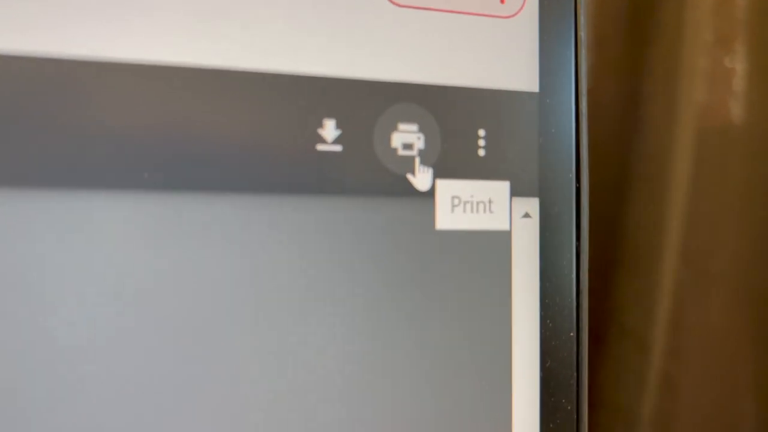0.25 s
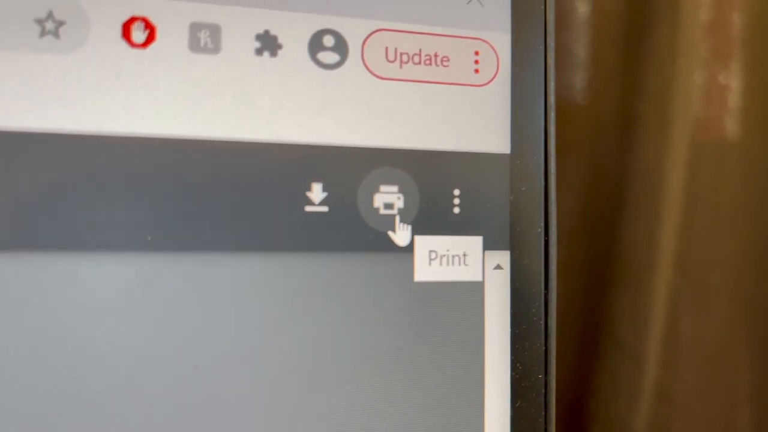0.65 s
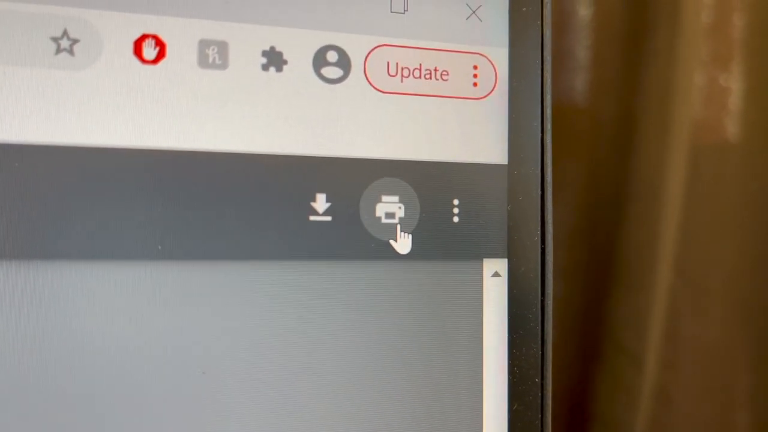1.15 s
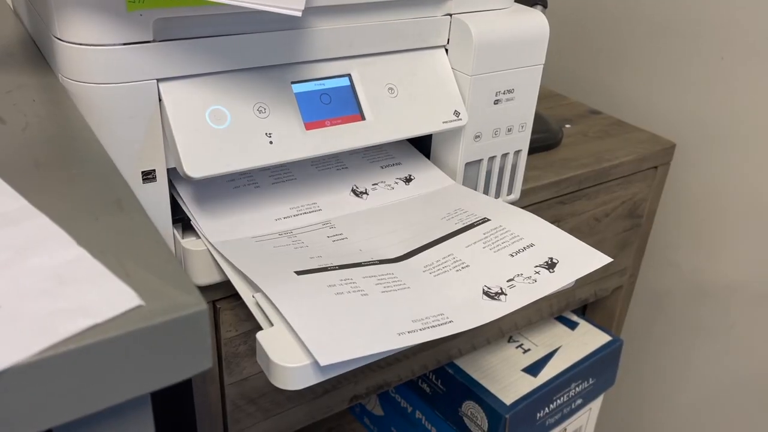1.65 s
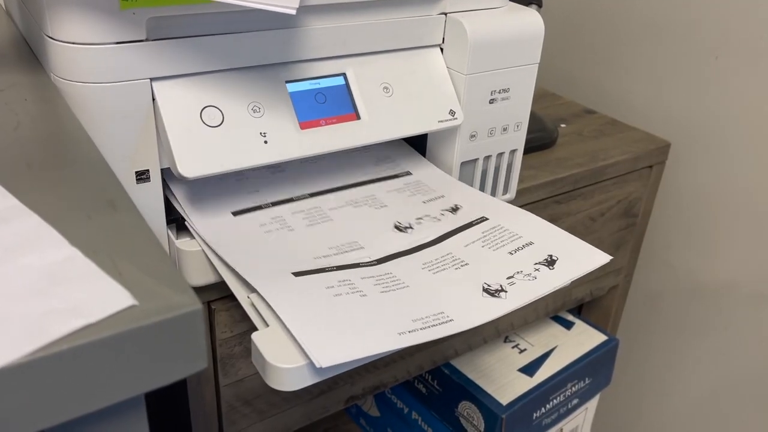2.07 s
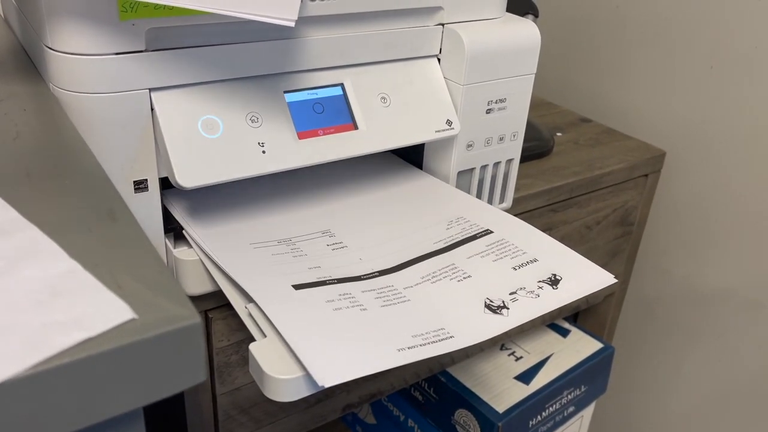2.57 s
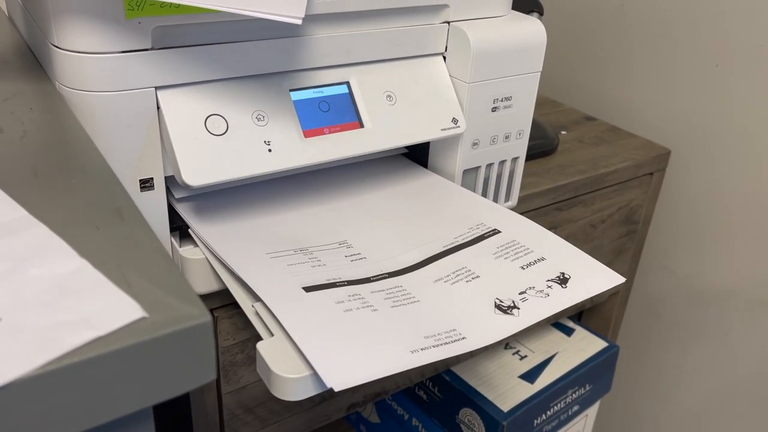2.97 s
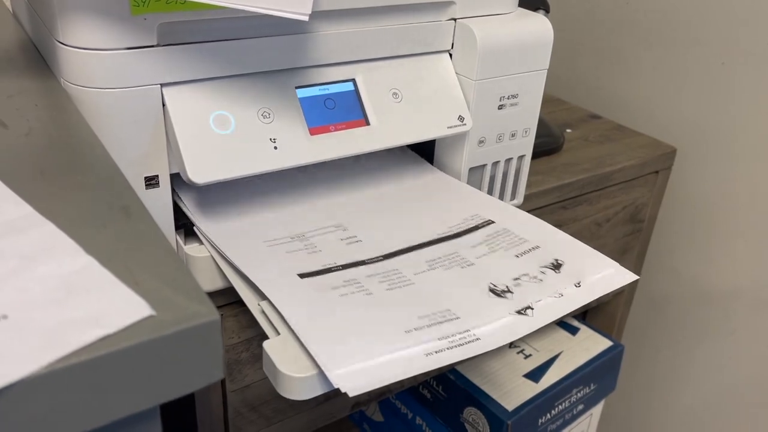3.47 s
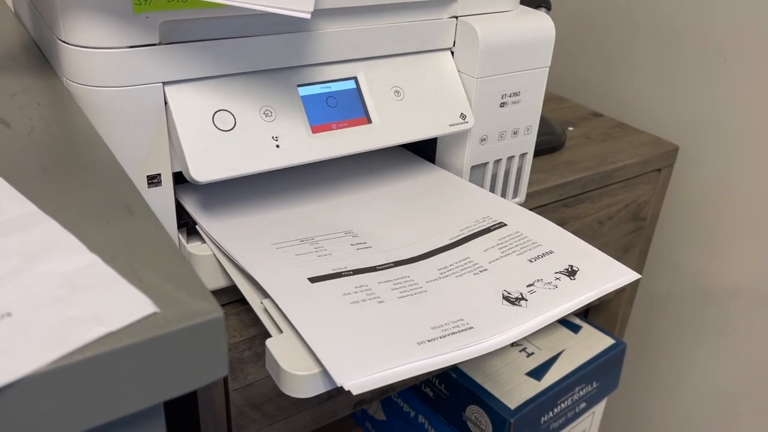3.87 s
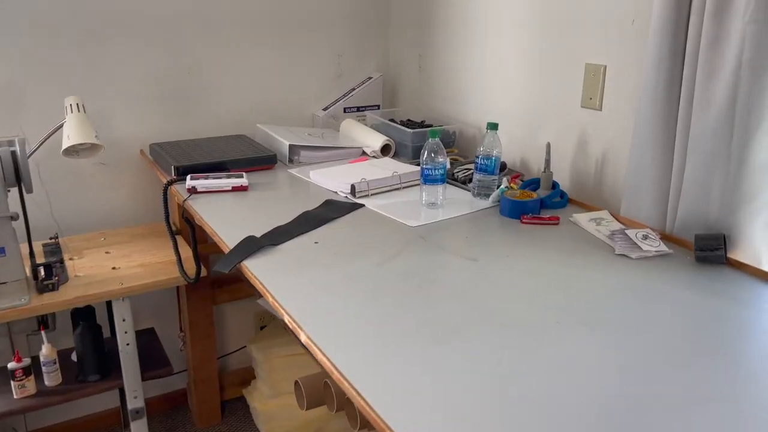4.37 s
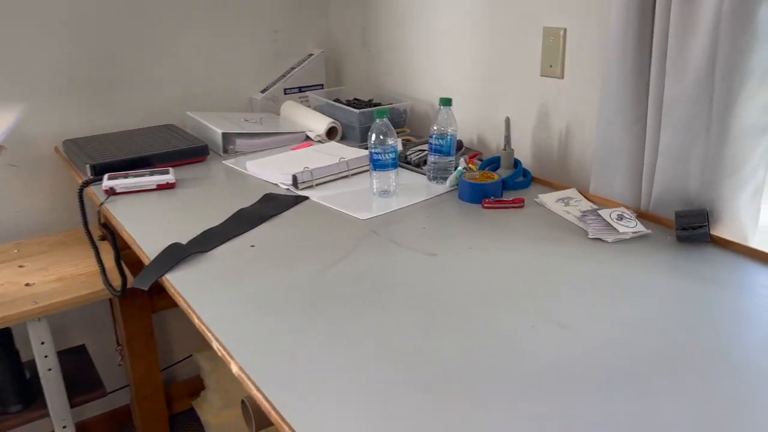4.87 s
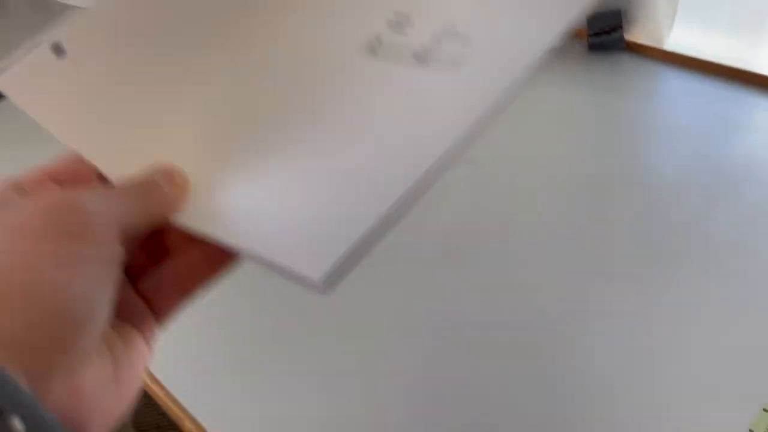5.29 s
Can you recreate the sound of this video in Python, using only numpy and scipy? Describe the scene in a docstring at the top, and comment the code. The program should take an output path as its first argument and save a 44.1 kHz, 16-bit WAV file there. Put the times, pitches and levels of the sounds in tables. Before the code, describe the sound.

For the first 1.3 seconds there is only faint, low office air, with a mouse click at about 0.8 s: a light press, then a brighter release just before 0.9 s. At 1.3 s an inkjet printer cuts in, close and slightly left. Paper rollers rattle and hiss in near-continuous short bursts until 2.0 s; then the carriage shuttles with a wavering motor whine, mixed with feed bursts. Plastic latches tick and knock throughout, the sharpest at 2.83 s. Activity dips around 2.9-3.1 s, then busy whirring resumes until an abrupt stop at 4.2 s. A low, boomy workroom rumble replaces it. A carried sheet swishes faintly, with soft bumps near 4.8, 5.0 and 5.2 s and a crackle around 5.35-5.4 s. At 5.47 s paper and hand slap the table: a very loud, clipped crack with a thumping, briefly ringing tabletop, decaying into rumble.

```python
"""Mouse click, inkjet printer and paper slap

A mouse button clicks in a quiet office, then an inkjet printer is heard in short, abrupt bursts.
Noise shaped by resonances makes its rattle and paper hiss, wavering sine tones its motor whine,
and short fading noise its latches. In a rumbling workroom the printed sheet then rustles as swells
of noise and is slapped on a table, whose ringing tones and crack overload the microphones."""
import sys
import numpy as np
from scipy import signal
from scipy.fft import rfft, irfft
from scipy.io import wavfile
from scipy.ndimage import map_coordinates

SR = 44100
rng = np.random.default_rng(int(sys.argv[2]) if len(sys.argv) > 2 else 0)


def digitize_waveform(pressure):
    """Quantize a signal to 16-bit integers and store it at the path in sys.argv[1].

    Rows of a 2-D input are taken as channels; values are limited to [-1, 1].
    """
    field = np.atleast_2d(pressure).T
    bounded = np.clip(field, -1, 1)
    quanta = np.round(bounded * 32767).astype(np.int16)
    wavfile.write(sys.argv[1], SR, quanta)


N = 243873
T = np.arange(N) / SR  # time of each sample in seconds
HZ = np.maximum(np.arange(N // 2 + 1) * SR / N, 1)  # frequency of each spectrum point
PRINTER_ON_S, PRINTER_OFF_S = 1.32, 4.19


def undb(db):
    """Turn decibels into gain."""
    return 10 ** (np.asarray(db) / 20)


def unit(x):
    """Scale a sound to rms 1."""
    return x / np.sqrt(np.mean(x ** 2))


def colour(points):
    """Gain at every frequency, joined through (Hz, dB) points on a logarithmic pitch scale."""
    hz, db = np.transpose(points)
    return undb(np.interp(np.log(HZ), np.log(hz), db))


def resonance(hz, width_hz):
    """Complex response of one resonance, gain 1 at its centre."""
    return 1 / (1 + 1j * (HZ / hz - hz / HZ) * hz / width_hz)


def shape(x, response):
    """Filter a sound by a frequency response."""
    return irfft(rfft(x) * response, N)


def wander(count, size):
    """Smooth random values with about count turns over size points, spread near 1."""
    knots = rng.standard_normal(count + 4)
    return map_coordinates(knots, [np.linspace(1, count + 1, size)], order=2)


def walk(rate):
    """Smooth chance through time, with about 2 * rate turns a second."""
    return wander(int(2 * rate * T[-1]), N)


def gate(start, end, edge=.0015):
    """1 between two times, with short ramps of edge seconds."""
    opening = np.clip((T - start) / edge + .5, 0, 1)
    closing = np.clip((end - T) / edge + .5, 0, 1)
    return opening * closing


def curve(rows):
    """Join (seconds, value) points through time."""
    return np.interp(T, *np.transpose(rows))


def fade(start, t60, rise=0.00058):
    """Envelope of a blow: quick rise, then an exponential fall of 60 dB in t60 seconds."""
    age = np.maximum(T - start, 0)
    return (1 - np.exp(-age / rise)) * np.exp(-np.log(1000) * age / t60)


# How wide the noise is between left and right.
# Each row: frequency in Hz, level of the side signal relative to the middle in dB.
STEREO_WIDTH = [(60, -19.5), (200, -15.5), (400, -6.5), (700, -11), (1200, -4), (2200, -1.5), (4000, -3.5),
                (7000, -5), (9000, -22.5), (10200, -34), (12000, -22)]


def texture(response, grain_db=0):
    """Stereo noise of tiny impacts through a response, middle at rms 1; grain spreads their sizes."""
    # each size holds for 16 samples
    sizes = np.repeat(undb(grain_db * rng.exponential(size=N // 16 + 1)), 16)[:N]
    impacts = rng.standard_normal((2, N)) * sizes
    mid, side = shape(impacts, response)
    side = shape(side, colour(STEREO_WIDTH))
    return np.array([mid + side, mid - side]) / np.std(mid)


# Bursts of the rollers that advance the paper.
# Each row: start in seconds, end in seconds, swell in seconds, fall in seconds, rattle in dB,
# then hiss and gear whine relative to that rattle in dB (printer() trims rattle and hiss further).
PAPER_BURSTS = [ (1.32, 1.471, .07, 0.031, -32.5, -3.5, -16), (1.466, 1.583, 0.031, 0.027, -35.5, -4, -0.5),
                (1.579, 1.687, 0.014, 0.067, -34, -4, -5), (1.697, 1.901, 0.034, 0.0069, -32.5, -5, 0.5),
                (1.895, 2.007, 0.016, 0.032, -35.5, -3, 1.5), (2.304, 2.356, 0.049, 0.0026, -32, -4.5, -7),
                (2.809, 2.91, 0.0021, 0.018, -32, -6, -9), (3.359, 3.431, 0.038, 0.015, -33.5, -2, -3.5)]
# Bursts of the carriage on its rail. Each row: the same columns, with the whine of its motor.
CARRIAGE_BURSTS = [ (2.031, 2.053, 0.017, 0.0033, -37, -4, -9), (2.087, 2.305, 0.03, 0.051, -32.5, -4, 1),
                   (2.402, 2.475, 0.044, 0.034, -35, -1, -10),
                   (2.498, 2.608, 0.0033, 0.065, -31.5, -3, 0.5),
                   (2.589, 2.661, 0.026, .014, -32, -3, -0.5), (2.664, 2.787, .008, 0.052, -32.5, -3, -3.5),
                   (3.003, 3.072, 0.0023, 0.063, -51, -2.5, -17), (3.073, 3.1, .002, 0.034, -43, -10, -8),
                   (3.111, 3.346, 0.0023, 0.059, -32, -4, 2.5), (3.448, 3.64, 0.034, .052, -32, -3.8, 3),
                   (3.643, 3.732, 0.047, 0.0078, -31.5, -5.5, -8), (3.736, 3.851, 0.015, 0.043, -34, -2, 2),
                   (3.866, 3.963, 0.021, 0.041, -32, -4.5, 4), (3.953, 4.032, 0.024, .009, -32.3, -3.5, 6),
                   (4.036, 4.145, .011, 0.059, -32.5, -4.5, -2.5),
                   (4.161, 4.191, 0.019, 0.01, -40, -3.5, -10.5)]
# Tone colour of the paper feed, of the carriage and of the hiss.
# Each row: frequency in Hz, level in dB per Hz.
FEED_COLOUR = [(110, -32), (180, -5), (398, -8), (696, 1), (851, -4), (930, -1.5), (1160, -5.5), (1610, -8),
               (1800, -11), (2380, -18), (2600, -13.5), (3380, -54), (5720, -120)]
CARRIAGE_COLOUR = [(110, -18), (180, -19), (199, -5), (416, -9), (481, -0.5), (795, -1), (860, -2.5),
                   (1090, -0.5), (1180, 0), (1270, -4), (1470, -6), (1590, 0), (1780, -9), (2250, -13),
                   (2600, -12), (3380, -67), (5720, -120)]
HISS_COLOUR = [(1500, -15.5), (2200, -6.5), (2700, -2.5), (3250, 1), (4000, -3), (5000, -6), (6500, -7),
               (7600, -7.5), (8800, -3.5), (10000, -7), (11200, -8.5), (12200, -15), (12800, -27),
               (13600, -52)]
# Resonances of the plastic housing, which printer() lifts by ring_db.
# Each row: centre in Hz, width in Hz, level in dB.
HOUSING_RESONANCES = [(362, 110, -4.5), (592, 32, -16), (631, 9.9, 3), (700, 29, -1), (814, 30, -1),
                      (924, 57, 1), (1090, 31, -3), (1360, 120, 2.5), (1730, 37, -14), (1840, 66, 0)]
# Gear tones of the paper feed. Each row: frequency in Hz, level relative to the feed whine in dB.
FEED_TONES = [(646, -13), (942, -6), (1287, -19), (1464, -14), (2019, -22), (2912, -31), (3542, -34.5)]
# Tones of the carriage motor.
# Each row: multiple of the cogging rate, level relative to the motor whine in dB.
COG_ORDERS = [(5, -16.5), (7, -13.5), (8, -14), (10, -10), (12, -31), (20, -21), (25, -24)]
COG_HZ = 158


def printer(rattle_db=-0.27, hiss_db=-1.5, ring_db=1, tooth_depth=0.045, judder_db=1.0):
    """Gear teeth rattle the housing, paper and rail hiss, motors whine; all are heard in bursts."""
    feed, paper_slide, rolling = burst_levels(PAPER_BURSTS)
    carriage, rail_slide, cruise = burst_levels(CARRIAGE_BURSTS)
    ring_powers = [abs(undb(db + ring_db) * resonance(hz, width_hz)) ** 2
                   for hz, width_hz, db in HOUSING_RESONANCES]
    housing = np.sqrt(1 + sum(ring_powers))

    # each cog of the motor presses the teeth together once
    cog_phase = 2 * np.pi * np.cumsum(COG_HZ * (1 + 0.027 * walk(12))) / SR
    cogs = unit(1 + tooth_depth * np.cos(cog_phase))
    teeth = travelling(housing, grain_db=2.0, ripple_db=3.0) * undb(judder_db * walk(30))
    feed_rattle = feed * unit(shape(teeth, colour(FEED_COLOUR)))
    carriage_rattle = carriage * unit(shape(teeth, colour(CARRIAGE_COLOUR)))
    rattle = undb(rattle_db) * (feed_rattle + carriage_rattle)

    hiss_noise = travelling(colour(HISS_COLOUR), grain_db=1.8, ripple_db=3.0)
    hiss_noise = hiss_noise * undb(1.3 * walk(69.4))  # the hiss flickers quickly
    hiss = undb(hiss_db) * (paper_slide + rail_slide) * hiss_noise

    feed_whine = rolling * sum(undb(db) * tone(hz, drift=0.0085) for hz, db in FEED_TONES)
    motor_tones = sum(undb(db) * tone(order * COG_HZ, drift=0.00581) for order, db in COG_ORDERS)
    return cogs * (rattle + hiss) + feed_whine + cruise * motor_tones


def burst_levels(bursts, tail_db=-17, tail_t60=0.044, hiss_power=1.295, whine_power=1.9):
    """Rattle follows each burst and leaves a faint tail; hiss and whine follow powers of its level."""
    rattle = hiss = whine = 0
    for start, end, swell_s, fall_s, db, rel_hiss_db, rel_whine_db in bursts:
        level = burst(start, end, swell_s, fall_s)
        rattle = rattle + undb(db) * (level + undb(tail_db) * fade(end, tail_t60))
        hiss = hiss + undb(db + rel_hiss_db) * level ** hiss_power
        whine = whine + undb(db + rel_whine_db) * level ** whine_power
    return rattle, hiss, whine


def burst(start, end, swell_s, fall_s, start_level=.25, end_level=0.1):
    """Level of one burst: abrupt start, swell towards full level (1), fall, abrupt end."""
    rising = start_level + (1 - start_level) * (T - start) / swell_s
    falling = end_level + (1 - end_level) * (end - T) / fall_s
    return gate(start, end) * np.clip(np.minimum(rising, falling), 0, 1)


def travelling(response, grain_db, ripple_db, count=3):
    """Impacts from a moving part: each place on its way rings the casing with its own fine peaks."""
    places = []
    for _ in range(count):
        fine_peaks = undb(ripple_db * wander(len(HZ) // 400, len(HZ)))
        places.append(texture(response * fine_peaks, grain_db))
    nearness = np.exp(1.5 * np.array([walk(4) for _ in range(count)]))
    nearness = nearness / np.linalg.norm(nearness, axis=0)  # steady total power
    return sum(near * place for near, place in zip(nearness, places))


def tone(hz, drift):
    """A sine of rms 1 whose pitch wavers; reflections shift its phase between the ears."""
    phase = 2 * np.pi * np.cumsum(hz * (1 + drift * walk(24.96))) / SR
    spread = 0.56 * walk(4)
    return np.sqrt(2) * np.sin([phase + spread, phase - spread])


# Latches that snap. Each row: start in seconds, tick in dB, knock relative to the tick in dB.
LATCH_SNAPS = [(1.383, -34.5, 8), (1.717, -24.5, -1.5), (1.923, -22.5, -4.5), (2.087, -35, 0),
               (2.421, -26.5, -4), (2.497, -32, 2), (2.676, -24.5, -3), (2.809, -39, 6), (2.834, -14, -9),
               (2.841, -39, 14), (2.868, -23.5, -3), (2.914, -23, -11), (3.075, -38.5, -12),
               (3.111, -45, -11), (3.235, -21.5, -15), (3.401, -33, 10), (3.668, -25.5, -3)]
# Tone colour of the tick. Each row: frequency in Hz, level in dB per Hz.
TICK_COLOUR = [(1200, -15.5), (2400, -8.5), (3600, 7.5), (6000, -4.5), (9000, 7.5), (11500, -1),
               (13500, -44)]


def latches(tick_t60=0.019, knock_t60=0.039, soft_s=0.001):
    """Plastic parts snap into place: a bright tick and a duller knock of the housing."""
    tick = knock = 0
    for s, db, knock_db in LATCH_SNAPS:
        tick = tick + undb(db) * fade(s, tick_t60, rise=soft_s)
        knock = knock + undb(db + knock_db) * fade(s, knock_t60, rise=soft_s)
    return tick * texture(colour(TICK_COLOUR)) + knock * texture(colour(FEED_COLOUR))


# The paper catching on its guides. Each row: peak in seconds, half-width in seconds
# (where the swell is down to 37 %), hiss in dB, housing sound relative to the hiss in dB.
GUIDE_SCRAPES = [(1.497, .008, -34, -6), (2.166, .012, -33, -1), (2.231, .017, -32.5, 2.5),
                 (2.63, .016, -34, 1), (3.991, .013, -33, -3)]


def scrapes():
    """The paper catches on its guides: a short swell of hiss that also shakes the housing."""
    hiss = body = 0
    for s, width_s, db, body_db in GUIDE_SCRAPES:
        swell = np.exp(-((T - s) / width_s) ** 2)
        hiss = hiss + undb(db) * swell
        body = body + undb(db + body_db) * swell
    hiss_noise = texture(colour(HISS_COLOUR), grain_db=1.8)
    body_noise = texture(colour(CARRIAGE_COLOUR), grain_db=1.5)
    return hiss * hiss_noise + body * body_noise


# Blows of hand and paper on the table. Each row: start in seconds, level in dB.
SLAP_BLOWS = [(5.4656, -28), (5.4701, 4.5), (5.4812, -13)]
# Ringing tones of the table top. Each row: frequency in Hz, level in dB,
# time to fall by 60 dB in seconds.
TABLE_MODES = [(56.7, -14.5, 0.34), (85, -16, 0.56), (176, -12, 0.27), (246, -15, 0.37), (329, -9.5, 0.14),
               (367, -5.5, 0.094), (450, -16, .12), (594, -16, 0.14), (709, -12, 0.071), (801, -8, 0.073),
               (997, -29, 0.13), (1263, -20, 0.2), (1670, -24, 0.15), (2090, -31, 0.083), (2700, -29, 0.09)]
# Tone colour of the crack of air. Each row: frequency in Hz, level in dB per Hz.
SLAP_COLOUR = [(50, -14), (150, 5), (400, 3.5), (800, 7.5), (1300, -13.5), (2000, -16), (3000, -24.5),
               (5000, -34), (9000, -29.5), (12000, -32), (14000, -64)]


def slap(crack_db=1, crack_t60=0.027, tail_db=-13, tail_t60=0.19, bend_db=10, bend_t60=0.023,
         first_hz=1150, last_hz=170, glide_s=0.00237):
    """Hand and sheet land: trapped air cracks, the table top bends and rings, the room follows."""
    out = 0
    crack = texture(colour(SLAP_COLOUR))
    for s, db in SLAP_BLOWS:
        # the wave of bending and ringing reaches the right microphone 0.12 ms after the left
        age = np.maximum(T - s - np.array([[0], [.00012]]), 0)
        # bending waves are faster when short, so the pitch of the blow dives
        glide = (first_hz - last_hz) * glide_s * (1 - np.exp(-age / glide_s))
        cycles = last_hz * age + glide
        bend = undb(bend_db) * fade(s, bend_t60) * np.sin(2 * np.pi * cycles)
        ring = sum(undb(mode_db) * fade(s, t60, rise=0.0061) * np.sin(2 * np.pi * hz * age)
                   for hz, mode_db, t60 in TABLE_MODES)
        air = crack * (undb(crack_db) * fade(s, crack_t60) + undb(tail_db) * fade(s, tail_t60))
        out = out + undb(db) * (bend + ring + air)
    return out


# Tone colour of crackling paper. Each row: frequency in Hz, level in dB per Hz.
CRACKLE_COLOUR = [(1800, -7), (3000, 1.5), (6000, -4.5), (9300, 2.5), (10500, -2), (11800, -14),
                  (13000, -34)]


def paper_edge(at_s=5.4672, edge_db=-17, edge_t60=0.051):
    """The edge of the sheet snaps on the table just before the loudest blow of the hand."""
    return undb(edge_db) * fade(at_s, edge_t60, rise=0.00066) * texture(colour(CRACKLE_COLOUR))


# Flexes of the sheet on its way to the table. Each row: peak in seconds, rise in seconds,
# fall in seconds (both for a change to or from 37 %), swish in dB, crackle in dB.
SHEET_FLEXES = [(4.2, 0.018, 0.066, -59, -69), (4.345, .035, 0.027, -53.5, -61.5),
                (4.771, 0.02, 0.081, -52.5, -62), (5.0, 0.21, 0.27, -51, -65.5),
                (5.355, 0.011, 0.027, -62, -42.5), (5.404, .005, 0.017, -49.5, -47.5),
                (5.462, 0.016, .01, -45.5, -67)]
# Tone colour of the air moved by the sheet. Each row: frequency in Hz, level in dB per Hz.
SWISH_COLOUR = [(180, -23), (300, -3.5), (400, -5), (523, -14), (635, -10), (1050, -15.5), (1700, -17.5),
                (3500, -37), (4550, -64), (7700, -120)]


def sheet():
    """Each flex of the carried sheet swells and dies away, with a swish of air and a crackle."""
    swish = crackle = 0
    for s, rise_s, fall_s, swish_db, crackle_db in SHEET_FLEXES:
        swell = np.exp(-np.maximum((s - T) / rise_s, (T - s) / fall_s))
        swish = swish + undb(swish_db) * swell
        crackle = crackle + undb(crackle_db) * swell
    air = swish * texture(colour(SWISH_COLOUR), grain_db=2.0)
    crisp = crackle * texture(colour(CRACKLE_COLOUR), grain_db=1.7)
    return (T > PRINTER_OFF_S) * (air + crisp)


# Press and release of the mouse button.
# Each row: start in seconds, level in dB, weight of the shell's middle ring in dB.
MOUSE_SNAPS = [(0.7887, -31.5, -5), (0.8711, -25, 5)]
# Resonances of the mouse shell. Each row: centre in Hz, width in Hz, level in dB.
MOUSE_SHELL = [(800, 280, -12), (1260, 200, -9.5), (2110, 160, -18), (2720, 200, -17), (3800, 600, -11.5),
               (9100, 2200, -2.5), (11300, 1300, -8)]
# Tone colour of the snap. Each row: frequency in Hz, level in dB per Hz.
MOUSE_COLOUR = [(200, -18), (700, 0), (12000, -1.5), (14000, -4)]


def mouse(snap_t60=0.012, room_db=-24, room_t60=0.18, ring_hz=5550, ring_width_hz=1100):
    """The switch snaps down and up, ringing the shell; the office answers faintly."""
    shell = sum(undb(db) * abs(resonance(hz, width_hz)) ** 2 for hz, width_hz, db in MOUSE_SHELL)
    middle_ring = abs(resonance(ring_hz, ring_width_hz)) ** 4
    out = 0
    for s, db, ring_db in MOUSE_SNAPS:
        response = colour(MOUSE_COLOUR) * (shell + undb(ring_db) * middle_ring)
        envelope = fade(s, snap_t60, rise=0.0012) + undb(room_db) * fade(s, room_t60)
        out = out + undb(db) * texture(response) * envelope
    return out


# Soft bumps and ticks, with a very faint rustle at the very start.
# Each row: start in seconds, level in dB, centre in Hz, time to fall by 60 dB in seconds.
SOFT_BUMPS = [(.01, -73.5, 900, 0.29), (.162, -72, 3500, 0.029), (.261, -70.5, 1580, 0.045),
              (0.906, -52, 860, 0.15), (4.761, -43, 595, 0.1), (4.874, -48.5, 5700, 0.029),
              (4.986, -39, 615, 0.095), (4.999, -33.5, 280, 0.18), (5.214, -46.5, 436, .13)]


def soft_bumps(breadth=0.84, soft_s=0.0015):
    """Soft bumps and ticks, after a very faint rustle: fading bursts of broadly tuned noise."""
    out = 0
    for s, db, hz, t60 in SOFT_BUMPS:
        treble_cut = 1 + (HZ / (2 * hz)) ** 4
        response = resonance(hz, breadth * hz) ** 2 / treble_cut
        out = out + undb(db) * fade(s, t60, rise=soft_s) * texture(response)
    return out


# Tone colour of the cabinet. Each row: frequency in Hz, level in dB per Hz.
CABINET_COLOUR = [(22, -26), (45, -4), (70, -6.5), (110, -1.5), (148, -1.5), (200, -13), (300, -17),
                  (600, -20.5), (1500, -33), (3000, -38), (8000, -38), (12000, -43.5), (13500, -79)]


def cabinet(idle_db=-49, driven_db=-44.5):
    """The cabinet drones under the printer as low noise, louder during each burst."""
    bursts = sum(burst(*row[:4]) for row in PAPER_BURSTS + CARRIAGE_BURSTS)
    level = np.sqrt(undb(idle_db) ** 2 + undb(driven_db) ** 2 * bursts)
    return gate(PRINTER_ON_S, PRINTER_OFF_S) * level * texture(colour(CABINET_COLOUR))


# Tone colour of the office air and of the workroom rumble.
# Each row: frequency in Hz, level in dB per Hz.
OFFICE_COLOUR = [(13, -56), (22, -26), (38, -6.5), (59, -7), (109, -8.5), (212, -23.5), (256, -23.5),
                 (285, -27.5), (436, -36), (473, -37.5), (1020, -53), (1300, -52), (2410, -59.5),
                 (12900, -67), (16800, -102), (22000, -120)]
WORKROOM_COLOUR = [(22, -30), (48, 0.5), (72, -0.5), (105, 1), (145, 1.5), (185, -5), (230, -16),
                   (310, -25), (500, -37.5), (1000, -44), (3000, -53), (9500, -55.5), (11000, -58),
                   (14000, -84)]
# Loudness of the workroom. Each row: time in seconds, level in dB before the lift in backgrounds().
WORKROOM_LEVELS = [(4.19, -38.5), (4.278, -39.5), (4.398, -37.5), (4.618, -40.5), (5.26, -38),
                   (5.53, -37.5)]


def backgrounds(office_db=-54, workroom_lift_db=3):
    """Shaped noise: office air before the printer starts, the workroom's low rumble after it."""
    office = (T < PRINTER_ON_S) * undb(office_db) * texture(colour(OFFICE_COLOUR))
    workroom_level = undb(curve(WORKROOM_LEVELS) + workroom_lift_db)
    workroom_on = gate(PRINTER_OFF_S, 2 * T[-1], edge=0.0075)  # stays open to the end
    return office + workroom_on * workroom_level * texture(colour(WORKROOM_COLOUR))


# How far the printer leans to the left. Each row: frequency in Hz, left minus right in dB.
PRINTER_LEAN = [(100, 0.5), (360, 2), (1160, 4), (2100, 2.5), (3800, 5.5), (7000, 3), (12000, -1.5)]


def scene(table_lean_db=1.0):
    """The printer stands a little to the left; the table is almost straight ahead."""
    lean = np.sqrt(colour(PRINTER_LEAN))  # half the difference on each side
    machine = shape(printer() + latches() + scrapes(), np.array([lean, 1 / lean]))
    table_sides = undb(np.array([[1], [-1]]) * table_lean_db / 2)
    table = (slap() + paper_edge()) * table_sides
    return machine + table + mouse() + sheet() + soft_bumps() + cabinet() + backgrounds()


def record(dry, port_hz=10650, port_width_hz=1100, port_db=7.0, top_hz=15800):
    """The microphone ports ring above 10 kHz, the left one turning in phase; the loudest peaks clip."""
    ring = signal.lfilter(*signal.iirpeak(port_hz, port_hz / port_width_hz, fs=SR), dry)
    left, right = dry + (undb(port_db) - 1) * ring
    # taking away twice the peak turns the phase around 10.2 kHz and keeps the level
    left = left - 2 * signal.lfilter(*signal.iirpeak(10200, 6, fs=SR), left)
    clipped = np.clip([left, right], -1, 1)
    treble_limit = signal.ellip(8, .2, 70, top_hz, fs=SR, output="sos")
    return signal.sosfilt(treble_limit, clipped)


dry = scene()
out = record(dry)
digitize_waveform(out)
```